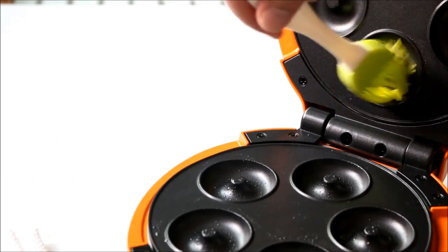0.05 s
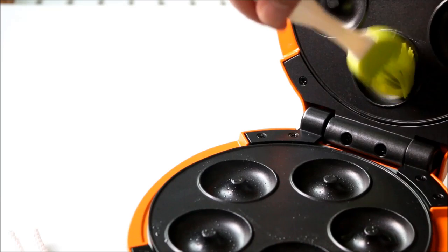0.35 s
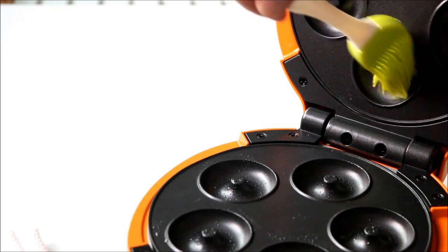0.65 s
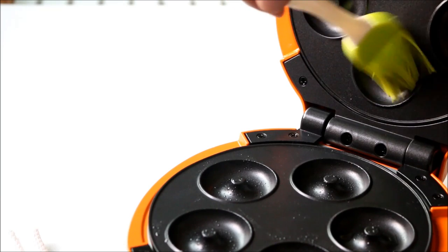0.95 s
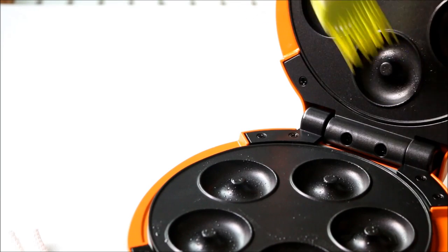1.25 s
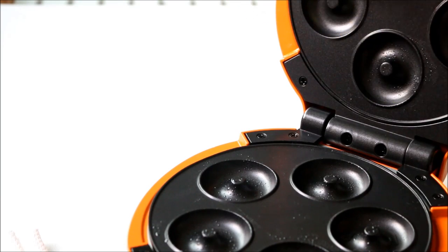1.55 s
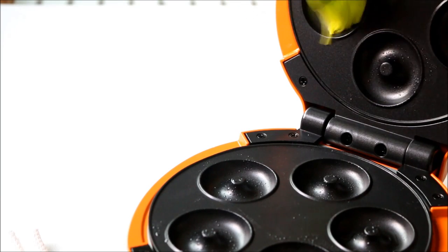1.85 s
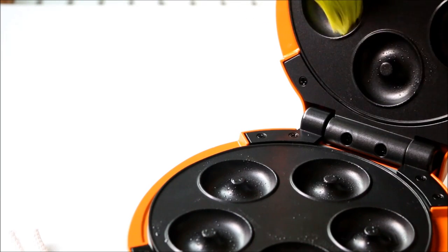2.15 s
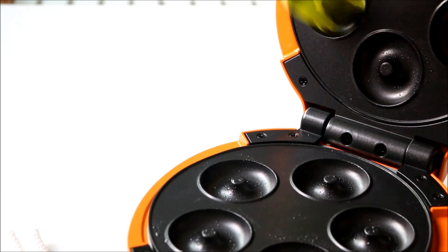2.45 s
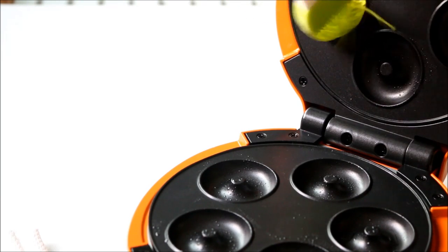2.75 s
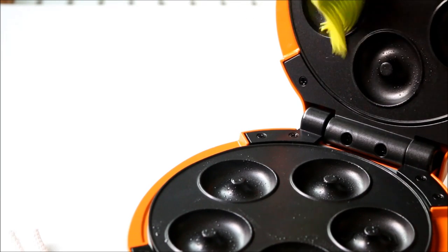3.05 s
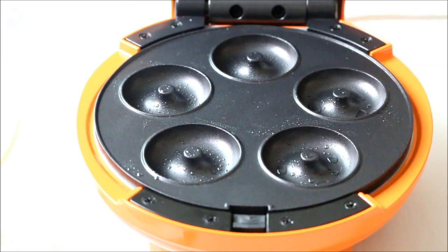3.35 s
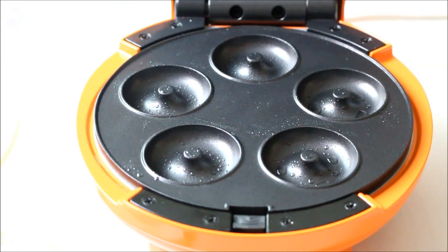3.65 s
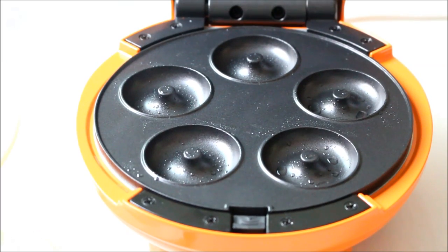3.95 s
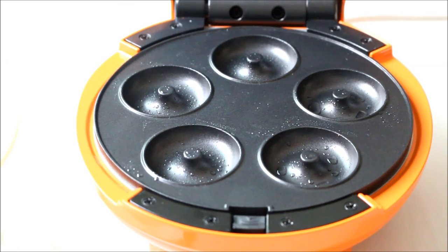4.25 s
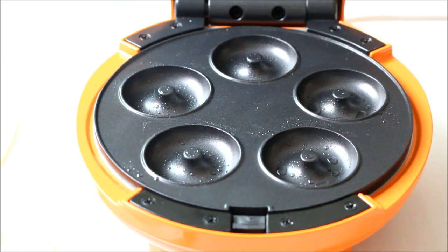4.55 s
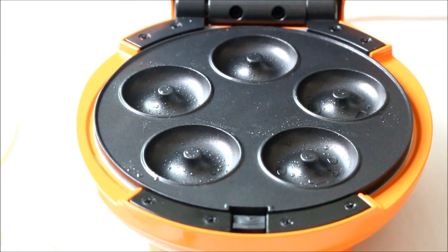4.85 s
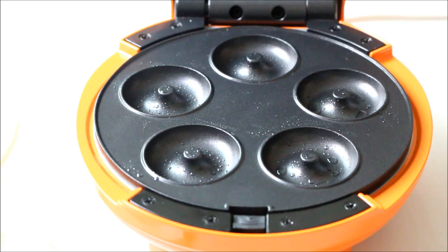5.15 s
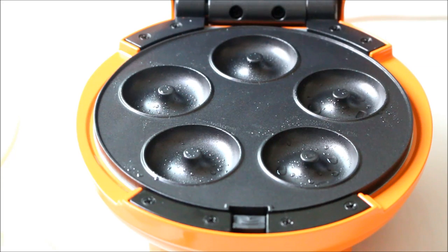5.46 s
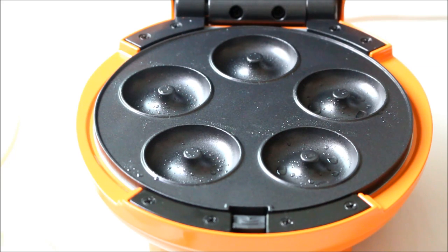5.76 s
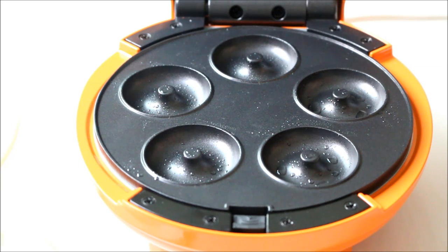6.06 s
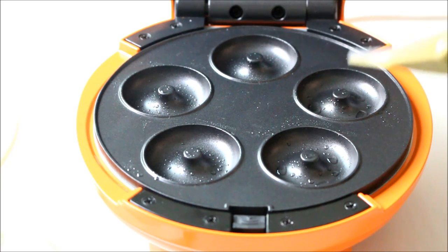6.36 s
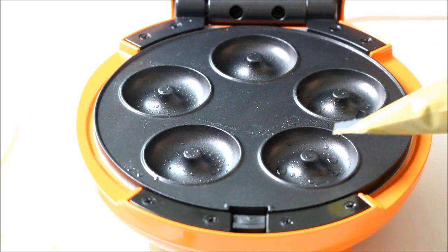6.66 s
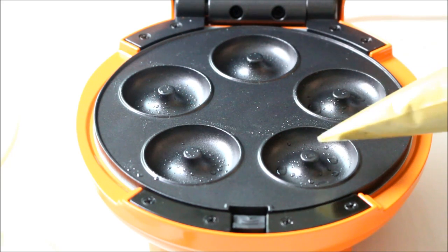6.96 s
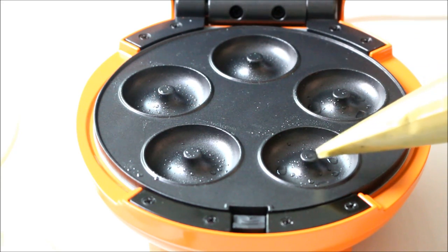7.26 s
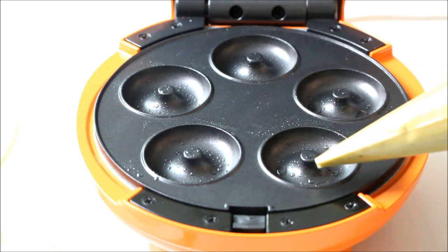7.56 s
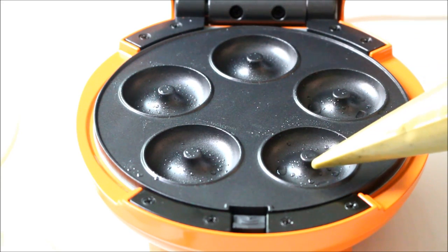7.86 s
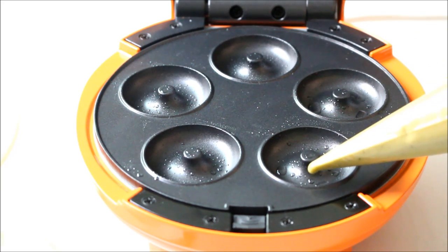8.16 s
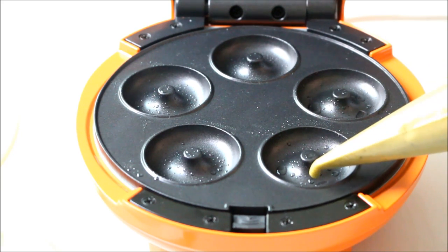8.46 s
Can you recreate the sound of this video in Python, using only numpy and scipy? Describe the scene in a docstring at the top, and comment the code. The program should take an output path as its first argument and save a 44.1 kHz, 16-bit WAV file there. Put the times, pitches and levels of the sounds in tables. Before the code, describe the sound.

A silicone brush softly rubs and flicks over a metal baking plate, then a plastic piping bag crinkles and something knocks sharply.

```python
"""A silicone brush dabs and rubs oil over the nonstick plates of a doughnut maker, close to a stereo
pair of microphones in a quiet kitchen. The bristles drag, flick against the metal and push on the
hollow housing, which hums, knocks and rocks. Then, just as close, a plastic piping bag is picked up:
its film slides, folds and crinkles taut. Something knocks sharply on the worktop, and the bag ticks
twice as it is squeezed. A short kitchen echo and faint room tone lie behind it all."""
import sys
import numpy as np
from scipy import signal
from scipy.fft import rfft, irfft
from scipy.io import wavfile

SR = 44100
rng = np.random.default_rng(int(sys.argv[2]) if len(sys.argv) > 2 else 0)


def inscribe(sig):
    """Save sig as 16-bit PCM at rate SR to the path in sys.argv[1].

    A 1-D sig is mono; a 2-D sig holds one channel per row.
    Samples are clipped to [-1, 1] before scaling.
    """
    pcm = np.round(np.clip(np.atleast_2d(sig).T, -1, 1) * 32767)
    wavfile.write(sys.argv[1], SR, pcm.astype(np.int16))


N = 375279
TIME = np.arange(N) / SR

# resonances of the baking plate: (frequency [Hz], width [Hz], level [dB])
PLATE_MODES = [(2270, 51, -8), (2655, 50, 7), (2805, 103, 2), (3000, 110, -5), (3230, 49, 0),
               (3545, 140, -5.5), (3890, 93, -2.5), (4260, 150, -3.5), (4640, 160, -5), (4960, 23, 1.5),
               (5820, 630, -18.5), (6270, 12, -15), (6570, 36, -6), (7060, 160, -13), (7750, 49, -4),
               (7840, 86, -7), (8190, 600, -11.5), (9720, 135, -9), (10600, 37, -1), (10310, 58, -24.5),
               (11700, 46, -4.5), (12900, 90, -11), (15070, 110, -6), (15900, 150, -24)]


def from_db(db):
    """Decibels as an amplitude gain."""
    return 10 ** (np.asarray(db) / 20)


def rms_one(x):
    """Scale a signal to rms 1."""
    return x / np.sqrt(np.mean(x ** 2) + 1e-20)


def at_hz(points, hz):
    """Read a table of (frequency [Hz], value) on a log-frequency axis."""
    known_hz, values = np.transpose(points)
    return np.interp(np.log(np.maximum(hz, 1)), np.log(known_hz), values)


def coloured(x, spectrum):
    """Give a noise a spectrum; rms 1."""
    size = x.shape[-1]
    gain = from_db(at_hz(spectrum, np.fft.rfftfreq(size, 1 / SR)))
    return rms_one(irfft(rfft(x) * gain, size))


def cut(x, hz, kind, order=2):
    """Butterworth low-, high- or band-pass."""
    sos = signal.butter(order, np.clip(hz, 10, .45 * SR), kind, fs=SR, output="sos")
    return signal.sosfilt(sos, x + 1e-18)


def grains(per_s, spread_db, clump_db, clumps_per_s=110):
    """Tiny slips of uneven size that come in clumps; rms 1."""
    sizes = from_db(spread_db * np.minimum(rng.exponential(1, N), 4)) * rng.choice([-1, 1], N)
    slips = rng.random(N) < per_s / SR
    steps = rng.standard_normal(4096)
    clumps = rms_one(np.interp(TIME * clumps_per_s, np.arange(len(steps)), steps))
    return rms_one(slips * sizes * from_db(clump_db * clumps))


def resonate(x, modes):
    """Parallel resonances of (frequency [Hz], width [Hz], level [dB]), with alternating signs."""
    out = 0
    for k, (hz, width, db) in enumerate(modes):
        r = np.exp(-np.pi * width / SR)
        ring = signal.lfilter([1, 0, -1], [1, -2 * r * np.cos(2 * np.pi * hz / SR), r * r], x + 1e-18)
        out = out + (-1) ** k * from_db(db) * (1 - r * r) / 2 * ring
    return out


def add(track, s, sound):
    """Lay a sound into a track at s seconds."""
    start = max(round(s * SR), 0)
    track[start:start + len(sound)] += sound[:N - start]


def gestures(rows, attack_s, sag_db_per_s, release_s, rise_share=0):
    """Gain of moves (start [s], length [s], level [dB]) that rise, sag and die; they add in power."""
    power, t = np.zeros(N), TIME[:SR]
    for s, length, db in rows:
        rise = np.minimum(t / max(attack_s + rise_share * length, 1 / SR), 1)
        release = np.exp(-np.maximum(t - length, 0) / release_s)
        add(power, s, (rise * from_db(db - sag_db_per_s * t) * release) ** 2)
    return np.sqrt(power)


def room_tone(level_db=-55.5):
    """The kitchen's low noise is alike on both sides; the hiss of the microphones is not."""
    # room noise and microphone hiss: (frequency [Hz], level [dB])
    spectrum = [(12, -56), (20, -11), (49, 0), (85, -4), (208, -4.5), (260, -4), (299, -7), (344, -5),
                (442, -9), (568, -9), (653, -10), (751, -10.5), (2110, -16), (14400, -19.5), (15700, -19.5)]
    # likeness of left and right: (frequency [Hz], correlation [0-1])
    likeness = [(60, 0.88), (150, 0.92), (380, 0.88), (950, 0.74), (2380, 0.49), (5980, 0.059),
                (15000, 0.04)]
    alike = at_hz(likeness, np.fft.rfftfreq(N, 1 / SR))
    mid, side = rfft(rng.standard_normal((2, N)))
    pair = irfft(np.sqrt(1 + alike) * mid + np.sqrt(1 - alike) * side * [[1], [-1]], N)
    return from_db(level_db) * coloured(pair, spectrum)


def stroke_gains():
    """Friction and drag gains: a stroke bites quickly, eases off as the bristles bend, and lets go."""
    # brush strokes: (start [s], length [s], bristle friction [dB], oily drag [dB])
    strokes = [(0.009, 0.099, -49, -51), (0.135, 0.087, -55, -56.5), (0.274, 0.028, -51.5, -49),
               (0.338, 0.091, -61, -59), (0.407, 0.033, -55, -50.5), (0.509, 0.038, -54.5, -55),
               (0.613, 0.045, -67, -56.5), (0.671, 0.17, -57.5, -55.5), (0.866, 0.035, -52, -47.5),
               (0.952, 0.13, -56, -53.5), (1.083, 0.091, -54.5, -55), (1.73, .025, -48, -52),
               (1.805, 0.19, -55, -58.5), (2.007, 0.088, -52, -51), (2.11, 0.15, -52, -56.5),
               (2.29, 0.13, -43.5, -48.5), (2.495, 0.21, -47.5, -49.5), (2.737, 0.057, -42, -44.5),
               (2.828, 0.032, -48, -55), (2.96, 0.14, -54.5, -55.5), (3.09, 0.067, -50.5, -54),
               (3.182, 0.02, -46.5, -49.5)]
    start, length, friction_db, drag_db = np.transpose(strokes)
    return [gestures(zip(start, length, db), attack_s=.034, sag_db_per_s=34.5, release_s=.039)
            for db in (friction_db, drag_db)]


def brush(friction, drag, friction_trim_db=-2, soft_hz=5500):
    """Bristles stick and slip on the oiled plate, ringing the metal and its cups."""
    # broad resonances of the cups: (frequency [Hz], width [Hz], level [dB])
    cup_modes = [(331, 28, -3.5), (410, 78, -7), (546, 50, 2), (688, 51, 3), (768, 43, 5), (970, 85, -4),
                 (1190, 83, -1.5), (1325, 210, -5), (1770, 1400, -12)]
    slips = cut(grains(per_s=1500, spread_db=1.7, clump_db=4.06), soft_hz, "low", order=1)
    plate = rms_one(resonate(slips, PLATE_MODES))
    cups = rms_one(resonate(grains(per_s=1500, spread_db=3.2, clump_db=2.35), cup_modes))
    return from_db(friction_trim_db) * friction * plate + drag * cups


def housing_hum(drag, drag_db=-4, push_trim_db=-1, push_width_s=.019, hum_hz=163, width_hz=14):
    """The weight of the hand on the brush makes the hollow housing hum."""
    # the hand leans on the housing: (peak time [s], level [dB])
    pushes = [(.085, -68), (.185, -48), (.335, -53), (.448, -52), (.66, -53), (.715, -54), (.91, -61),
              (1.041, -49), (1.865, -58), (1.94, -48), (2.11, -56), (2.39, -78), (2.595, -51),
              (2.67, -43.5), (2.82, -51), (3.02, -50)]
    weight = from_db(drag_db) * drag
    for s, db in pushes:
        weight += from_db(db + push_trim_db) * np.exp(-np.minimum(((TIME - s) / push_width_s) ** 2, 20))
    ring = resonate(rng.standard_normal(N), [(hum_hz, width_hz, 0)])
    hum = signal.hilbert(cut(ring, (135, 190), "band"))
    steadied = hum.real / np.abs(hum) ** .56   # the push, more than chance, sets how loud it hums
    return weight * rms_one(steadied)


def stray_bristles(friction, level_db=-9, band_hz=(4500, 8500)):
    """Single bristles tick against the plate at random during a stroke."""
    ticks = cut(grains(per_s=120, spread_db=2, clump_db=.89), band_hz, "band")
    return from_db(level_db) * friction * rms_one(resonate(ticks, PLATE_MODES))


def rocking(drag, rock_trim_db=-1, drag_db=-8):
    """The appliance shifts with a low rumble: a little with every stroke, more when it rocks."""
    # it rocks on its feet and settles: (start [s], length [s], level [dB])
    rocks = [(1.74, 0.24, -58), (2.53, 0.27, -62), (2.99, 0.083, -44.5), (3.1, 0.24, -52.5)]
    # the rumble: (frequency [Hz], level [dB])
    spectrum = [(20, -19), (38, 8.5), (55, -4), (75, 10.5), (100, -2), (130, -18), (250, -67)]
    rock = gestures(rocks, attack_s=.025, sag_db_per_s=22, release_s=.045)
    motion = from_db(rock_trim_db) * rock + from_db(drag_db) * drag
    return motion * coloured(rng.standard_normal(N), spectrum)


def bristle_flicks(click_db=-20, spot_db=2.5, oil_hz=10500):
    """A bent tuft springs free and patters onto the plate; oil dulls the highest modes."""
    # tufts landing: (time [s], peak [dB], decay [s], low edge [Hz], high edge [Hz])
    flicks = [(0.061, -38, .0007, 6000, 15000), (.218, -43, .0022, 3000, 9000),
              (0.295, -42.5, 0.0027, 2000, 5500), (.497, -39, 0.0034, 4500, 9000),
              (.901, -42, .0025, 2500, 9000), (1.0173, -37.5, 0.0014, 4000, 12100),
              (1.1385, -37.5, 0.0018, 4000, 15500), (1.2253, -45.5, .0015, 2200, 5500),
              (1.7495, -31, 0.0029, 2100, 4630), (1.77, -30.5, 0.0016, 4530, 15000),
              (2.043, -50, .003, 1200, 4000), (2.134, -33.5, 0.0018, 1800, 5940),
              (2.3301, -46, .0025, 1500, 5000), (2.367, -37, .002, 1800, 5500),
              (2.3971, -31.5, 0.0061, 3300, 9000), (2.505, -45, .0027, 1500, 5000),
              (2.537, -36.5, 0.0024, 3500, 8500), (2.577, -34.5, 0.0066, 1800, 6000),
              (2.6105, -26.5, 0.0029, 3600, 10000), (2.751, -42, .004, 1500, 5500),
              (2.7776, -34, 0.0092, 1840, 6500), (2.7947, -22.5, 0.0062, 4600, 8850)]
    out, t = np.zeros(N), TIME[:SR // 6]
    for s, db, decay_s, low_hz, high_hz in flicks:
        burst = rng.standard_normal(len(t)) * np.exp(-t / decay_s)
        patter = cut(burst, [low_hz, high_hz], "band", order=1)
        # each spot on the plate favours other modes
        modes = [(hz, width, level + spot_db * rng.standard_normal()) for hz, width, level in PLATE_MODES]
        sound = cut(resonate(patter, modes), oil_hz, "low") + from_db(click_db) * patter
        add(out, s, from_db(db) * sound / np.abs(sound).max())
    return out


def knocks(travel_s=.001287, build_cycles=1.96, impact_s=.013,
           crack_db=-21, crack_hz=2600, thud_db=-24, thud_hz=(340, 750)):
    """Blows crack, thud and ring the body; a soft contact leaves out the highs, a light one the lows."""
    # blows on housing and worktop: (time [s], gain [dB], low edge [Hz], high edge [Hz], damping time [s])
    blows = [(2.59, -22, 420, 696, .03), (2.6395, -8.5, 440, 633, 0.013), (2.998, -13.5, 55, 114, .12),
             (3.031, -21, 500, 685, .014), (3.96, -31.5, 750, 1700, .02), (5.791, -26.5, 330, 596, 0.0096),
             (6.782, -5, 100, 8900, 0.31)]
    # modes of housing and worktop: (frequency [Hz], level [dB], t60 [s])
    body_modes = [(76, -31, .5), (155, -18, .19), (164, -15, .26), (338, -22, .25), (338, -35, 1.1),
                  (497, -25, .2), (527, -25, .14), (569, -17, .14), (648, -14, .1), (703, -14, .11),
                  (736, -12, .085), (930, -16, .06), (1080, -15, .06), (1117, -18, .1), (1730, -18, .07),
                  (620, -10, .02), (830, -7, .02), (1270, -10, .025), (1600, -13, .028), (2060, -13, .03),
                  (2320, -17, .035), (2560, -16, .025), (2950, -21, .015), (3430, -23, .02),
                  (4300, -22, .015), (4780, -23, .015), (5370, -28, .015), (6240, -35, .012)]
    out, t, ring = np.zeros(N), TIME[:SR], 0
    for hz, db, t60 in body_modes:
        age = np.maximum(t - travel_s * np.sqrt(1000 / hz), 0)   # low bending waves arrive late
        build = np.minimum(age * hz / build_cycles, 1)
        ring = ring + build * from_db(db - 60 * age / t60) * np.sin(2 * np.pi * hz * age)
    contact = np.minimum(t / travel_s, 1) * np.exp(-t / impact_s)
    for s, db, low_hz, high_hz, damp_s in blows:
        crack = from_db(crack_db) * rms_one(cut(rng.standard_normal(len(t)), crack_hz, "low"))
        thud = from_db(thud_db) * rms_one(cut(rng.standard_normal(len(t)), thud_hz, "band"))
        blow = ring * np.exp(-t / damp_s) + contact * (crack + thud)
        softened = cut(blow, high_hz, "low", order=4)
        add(out, s, from_db(db) * cut(softened, low_hz, "high", order=3))
    return out


def bag_sliding(trim_db=2, split_hz=2500):
    """Film slides over film with a soft, grainy hiss that is brighter under a light touch."""
    # the bag shifts in the hand: (start [s], length [s], level [dB], brightness [dB])
    slides = [(3.443, 0.42, -63.5, -1.5), (3.753, 0.28, -64, 8), (4.057, 0.33, -61.5, 2),
              (4.53, 0.24, -61, 6.5), (4.65, 0.26, -58, 4), (5.334, 0.11, -50.5, 1.5),
              (5.446, 0.18, -58.5, 5.5), (5.564, 0.13, -52, 0.5), (5.7, 0.25, -53.5, -2.5),
              (5.951, 0.086, -50, 1.5)]
    # rubbing film: (frequency [Hz], level [dB])
    spectrum = [(120, -10), (340, 9), (700, 2.5), (1400, 3.5), (2800, 2.5), (5500, -2), (8500, -1),
                (11000, -2.5), (13500, -10.5), (16000, -12)]
    start, length, db, bright_db = np.transpose(slides)
    low_gain, high_gain = [
        gestures(zip(start, length, band_db), attack_s=.003, sag_db_per_s=11.5, release_s=.036,
                 rise_share=.31)   # a longer slide gathers speed more slowly
        for band_db in (db - bright_db, db + bright_db)]
    hiss = coloured(grains(per_s=12000, spread_db=1.8, clump_db=.65), spectrum)
    lows = cut(hiss, split_hz, "low", order=1)
    return from_db(trim_db) * (lows * low_gain + (hiss - lows) * high_gain)


def bag_folds(split_hz=1500, lows_late_share=1.15, lows_linger=1.4, hold_share=.47):
    """A collapsing fold is a swell of dense crackles; it sinks in pitch as the lows come late and stay."""
    # folds collapsing: (peak time [s], level [dB], rise [s], fall [s], high edge [Hz])
    folds = [(3.492, -54, .0045, .009, 2800), (4.014, -48.5, .002, .004, 3000),
             (4.119, -45, 0.00066, 0.0027, 3800), (4.9, -52.5, .004, .006, 3500),
             (5.012, -36.5, 0.015, 0.037, 5370), (5.279, -53, 0.0036, .01, 3500),
             (5.353, -33, 0.0025, 0.0032, 12000), (5.3582, -31, 0.0018, .003, 14000),
             (5.378, -44, 0.012, 0.021, 4500), (5.974, -39, .0009, 0.0052, 10900),
             (7.032, -40, 0.00073, 0.0038, 6000), (7.68, -44.5, 0.00064, 0.0029, 5000)]
    # crackling film: (frequency [Hz], level [dB])
    spectrum = [(100, -16), (350, -4.5), (600, -2.5), (900, 1.5), (1200, 2), (1500, -1), (2000, 3),
                (2900, -1.5), (3500, -0.5), (4200, -3.5), (4800, -5), (6000, -5.5), (9500, -3),
                (16000, -11)]
    out, crackle = np.zeros(N), coloured(grains(per_s=9000, spread_db=2.8, clump_db=.3), spectrum)
    for s, db, rise, fall, top_hz in folds:
        sound = rms_one(cut(crackle, top_hz, "low"))
        bands = ("high", s, fall), ("low", s + lows_late_share * rise, fall * lows_linger)
        for kind, peak_s, fall_s in bands:
            before = (peak_s - TIME) / rise
            after = (TIME - s - hold_share * fall) / fall_s
            swell = np.exp(-np.clip(np.maximum(before, after), 0, 20))
            out += from_db(db) * swell * cut(sound, split_hz, kind, order=3)
    return out


def bag_crinkling(slack_hz=8220, taut_hz=9560, tighten_at_s=5.87, tighten_s=.055, half_width_hz=750):
    """Fine crackles gather around one pitch, which climbs as the film tightens."""
    # the film is pulled taut: (start [s], length [s], level [dB])
    pulls = [(5.585, 0.081, -55), (5.72, .075, -53), (5.85, 0.079, -53.5), (5.97, 0.064, -55)]
    tension = (1 + np.tanh((TIME - tighten_at_s) / (2 * tighten_s))) / 2
    hz = slack_hz + (taut_hz - slack_hz) * tension
    crackle = cut(grains(per_s=3600, spread_db=2.2, clump_db=2.3), half_width_hz, "low")
    crinkle = rms_one(crackle * np.cos(2 * np.pi * np.cumsum(hz) / SR))
    return gestures(pulls, attack_s=.014, sag_db_per_s=5, release_s=.049) * crinkle


def bag_snaps(snap_s=.00084, click_db=-14):
    """A crease flips over with a tiny bright tick."""
    # creases snapping: (time [s], peak [dB])
    snaps = [(5.7325, -34), (5.74, -30), (5.7536, -28.5), (5.7684, -36), (5.7817, -28.5), (6.036, -36),
             (6.846, -42), (6.958, -44.5), (6.983, -45), (7.0322, -31.5), (7.6792, -31.5)]
    # resonances of the taut film: (frequency [Hz], width [Hz], level [dB])
    film_modes = [(8400, 2400, -12.5), (9000, 850, 2.5), (10900, 1500, -16)]
    out, t = np.zeros(N), TIME[:SR // 30]
    for s, db in snaps:
        flip = rng.standard_normal(len(t)) * np.exp(-t / snap_s)
        tick = resonate(flip, film_modes) + from_db(click_db) * flip
        add(out, s, from_db(db) * tick / np.abs(tick).max())
    return out


def bag_plucks(attack_s=.0015):
    """The filled bag jerks taut and rings briefly with a hollow pluck."""
    # the bag comes taut: (time [s], peak [dB])
    plucks = [(5.9719, -29), (5.983, -40)]
    # modes of the filled bag: (frequency [Hz], level [dB], t60 [s])
    bag_modes = [(520, -1.5, 0.032), (600, -6, 0.022), (1720, -14, .04), (2420, -6, 0.027),
                 (4080, -10, .06), (4490, -3, .03), (4840, -11, .07)]
    out, t = np.zeros(N), TIME[:SR // 6]
    ring = sum(from_db(db - 60 * t / t60) * np.sin(2 * np.pi * hz * t) for hz, db, t60 in bag_modes)
    ring *= 1 - np.exp(-t / attack_s)
    for s, db in plucks:
        add(out, s, from_db(db) * ring / np.abs(ring).max())
    return out


def kitchen_echo(x, build_s=.017, side_db=-8, side_hz=5000):
    """A diffuse tail dies band by band; at the closely spaced microphones only its treble differs."""
    # colour of the echo: (frequency [Hz], level [dB])
    spectrum = [(60, -1), (250, -9.5), (700, -1.5), (2000, -1), (5000, -6), (15000, -1.5)]
    # decay of the kitchen: (frequency [Hz], t60 [s])
    decay_times = [(100, 0.72), (700, 0.45), (2500, 0.46), (6000, 0.74), (15000, 0.13)]
    t, edges, tail = TIME[:SR * 3 // 4], np.geomspace(40, 17000, 10), 0
    for low, high in zip(edges, edges[1:]):
        band = cut(rng.standard_normal((2, len(t))), [low, high], "band")
        tail = tail + band * from_db(-60 * t / at_hz(decay_times, np.sqrt(low * high)))
    mid, side = coloured(tail, spectrum) * (1 - np.exp(-(t / build_s) ** 2)) / np.sqrt(len(t))
    side = from_db(side_db) * cut(side, side_hz, "high", order=1)
    return signal.fftconvolve(x[None], mid + side * [[1], [-1]], axes=1)[:, :N]


def scene(brush_wet_db=-17, knock_wet_db=-14, bag_wet_db=-10):
    """Brush, knocks and bag sit close and centred, each with its share of kitchen echo."""
    friction, drag = stroke_gains()
    oiling = brush(friction, drag) + housing_hum(drag) + stray_bristles(friction) + bristle_flicks()
    blows = knocks()
    bag = bag_sliding() + bag_crinkling() + bag_folds() + bag_snaps() + bag_plucks()
    into_room = from_db(brush_wet_db) * oiling + from_db(knock_wet_db) * blows + from_db(bag_wet_db) * bag
    echo = kitchen_echo(into_room)
    return oiling + blows + bag + rocking(drag) + echo + room_tone()


def record(dry, cutoff_hz=15800):
    """A steep low-pass takes off the very top."""
    return signal.sosfilt(signal.ellip(12, .1, 80, cutoff_hz, fs=SR, output="sos"), dry)


dry = scene()
out = record(dry)
inscribe(out)
```